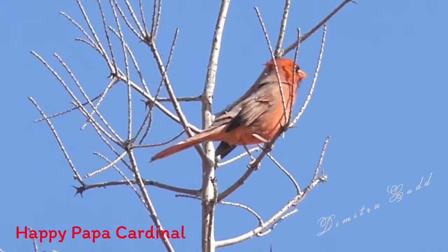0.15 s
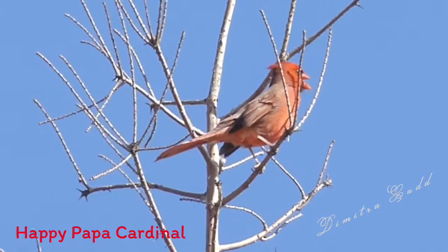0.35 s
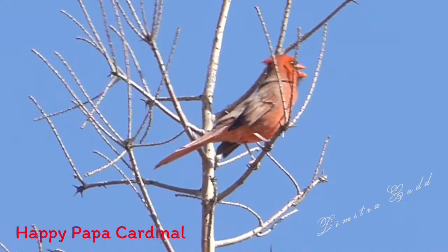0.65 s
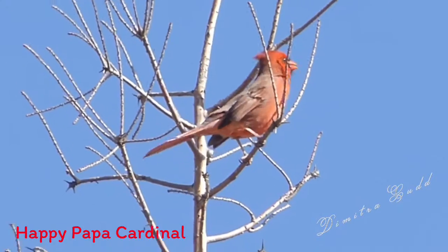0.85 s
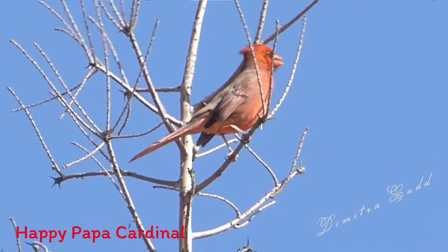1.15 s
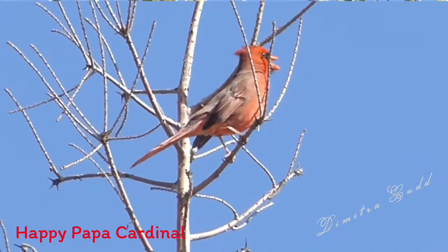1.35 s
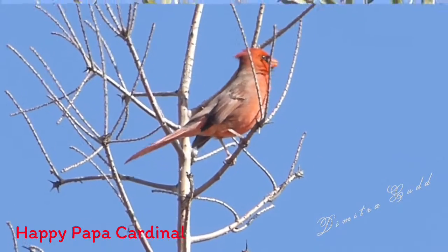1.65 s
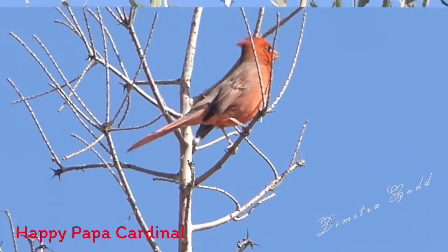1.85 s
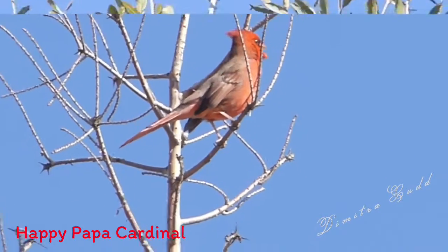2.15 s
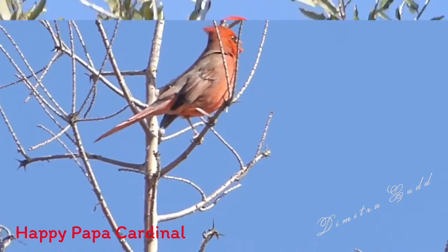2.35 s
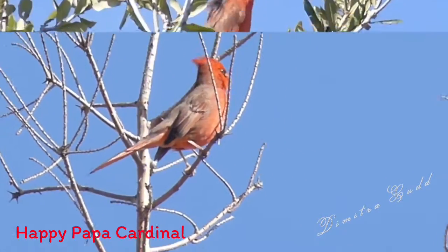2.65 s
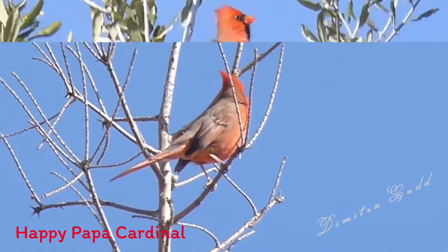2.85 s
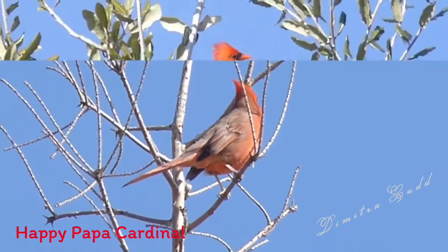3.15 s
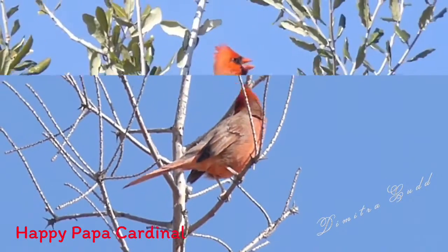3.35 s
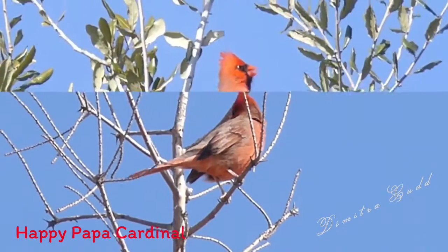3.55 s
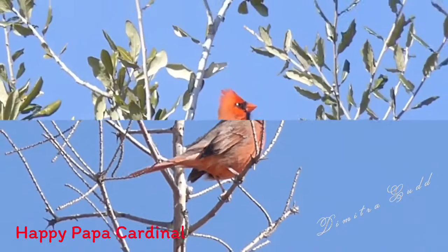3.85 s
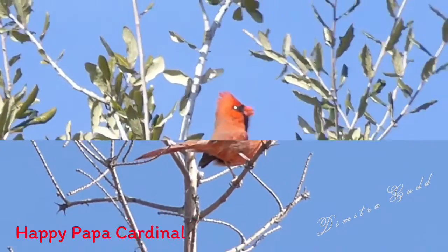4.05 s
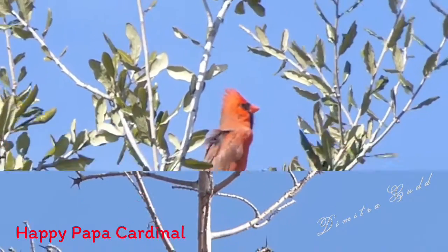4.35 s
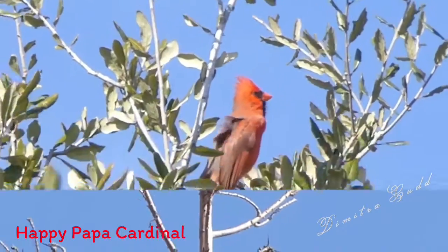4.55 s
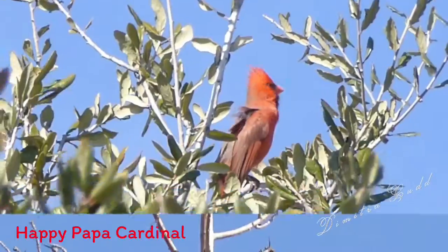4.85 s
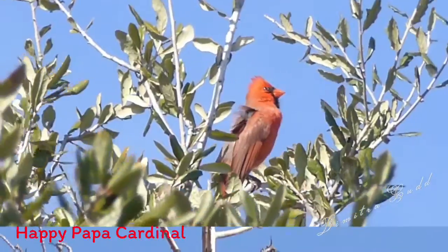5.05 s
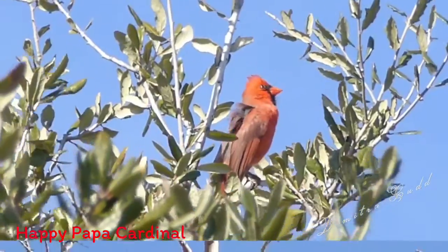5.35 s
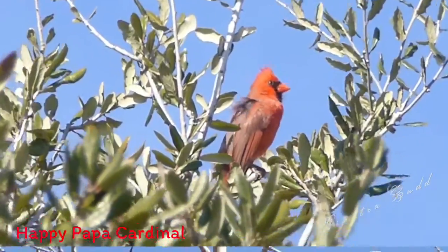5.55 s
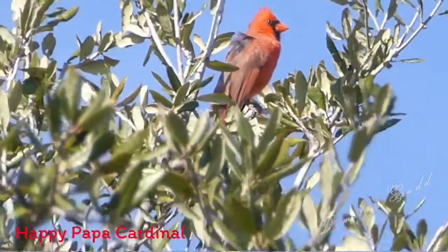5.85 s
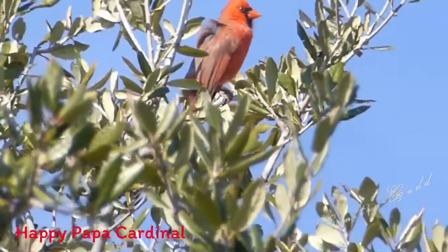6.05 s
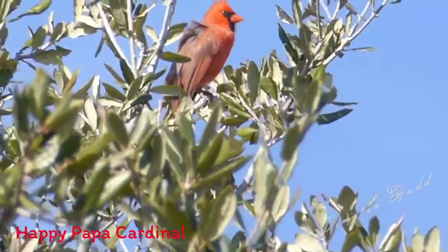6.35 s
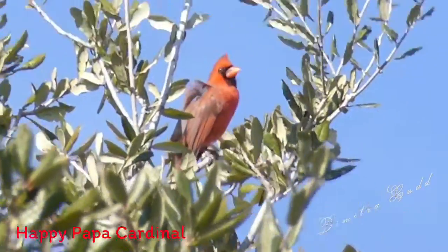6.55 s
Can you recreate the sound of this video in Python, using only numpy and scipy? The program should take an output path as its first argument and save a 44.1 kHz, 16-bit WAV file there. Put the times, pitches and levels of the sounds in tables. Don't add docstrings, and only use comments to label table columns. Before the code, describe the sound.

A near cardinal is already sliding down a pure whistle at the start, with a faint farther bird's low phrase around 0.2 s. A very steep high fall comes at 0.4 s, then a full down-slur from 0.55 to 0.75 s. After a shy upward sweep at 0.85 s, an even trill of sixteen quick rising chirps runs from 0.95 to 2.7 s, about nine per second, softening slightly. From 1.5 s the farther bird overlaps, alternating thin high falls with low notes that flip up; its falls sink and lengthen, becoming clearer from 3.4 s and slower until 5 s. Garden echoes blur both songs. Wind rumbles and pops on the right from 1.2 s, strongest near 1.4 and 2.4 s, with weaker puffs until 5.4 s. Town murmur, leaf hiss and a faint early engine hum recede, leaving quiet air until 6.7 s.

```python
import sys
import numpy as np
from scipy import signal
from scipy.fft import rfft, irfft
from scipy.io import wavfile
from scipy.ndimage import uniform_filter1d

SR = 44100
rng = np.random.default_rng(int(sys.argv[2]) if len(sys.argv) > 2 else 0)


def store_pcm(level_fs):
    pcm = np.round(np.clip(level_fs, -1, 1) * 32767).astype(np.int16)
    wavfile.write(sys.argv[1], SR, np.atleast_2d(pcm).T)


def decibels_to_gain(level_db):
    exponent = np.asarray(level_db, float) / 20
    return 10 ** exponent


N = 295470
TIME = np.arange(N) / SR
LEAD = SR // 4

# (time [s], pitch [Hz], level [dB])
STEEP_WHISTLE = [(.42, 8800, -52), (.455, 7220, -40), (.495, 5600, -36.5), (.512, 4960, -34),
                 (.527, 5010, -49)]
# (time after start [s], pitch [Hz], level under top [dB])
SLUR_SHAPE = [(0, 4080, -18), (.01, 3960, -6), (.05, 3664, -5), (.1, 3375, 0), (.15, 2977, -2),
              (.18, 2860, -3.5), (.21, 2830, -15)]
# (start [s], top level [dB])
SLUR_STARTS = [
    (-.14, -34),
    (.556, -29),
]
# (time [s], pitch [Hz], level [dB])
SHY_SWEEP = [(.848, 2000, -58), (.86, 2670, -36.5), (.875, 3520, -34.5), (.887, 4170, -36),
             (.897, 4730, -48)]
# (time after start [s], pitch [Hz], level under top [dB])
SWEEP_SHAPE = [(.007, 1955, -10), (.012, 2266, -11), (.018, 2577, -1.5), (.031, 3192, 1.5), (.046, 4013, 5),
               (.0535, 4550, 2), (.0565, 4860, -3.5), (.059, 6040, -17.5)]
# (start [s], top level [dB])
TRILL = [(0.95, -34.5), (1.063, -33), (1.178, -31.5), (1.295, -32.5), (1.406, -33), (1.519, -32.5),
         (1.634, -33), (1.748, -33), (1.86, -33.5), (1.972, -34), (2.084, -35), (2.198, -35.5),
         (2.308, -37.5), (2.426, -35.5), (2.539, -36.5), (2.654, -37)]
# (multiple [x], level [dB])
SLUR_OVERTONES = [(3, -23.5)]
# (lag [s], level [dB])
WALL_SLAPS = [
    (.034, -17.5),
    (.055, -22.5),
]

# (start [s], shelf pitch [Hz], hook [s], plunge [s], level [dB])
SINKING_FALLS = [
    (1.542, 6350, .036, 0.0049, -58),
    (1.742, 6290, 0.027, 0.001, -51),
    (1.937, 6300, 0.03, 0.00086, -53.5),
    (2.134, 6150, 0.024, 0.0011, -49.5),
    (2.327, 5940, 0.026, 0, -45.5),
    (2.521, 5560, 0.028, 0.00055, -50.5),
    (2.712, 4800, 0.035, 0.005, -53),
    (2.896, 4460, .027, 0.014, -56.5),
    (3.087, 4400, 0.021, 0.017, -53.5),
    (3.276, 4405, 0.021, 0.021, -53),
]
# (time after start [s], pitch [Hz], level under top [dB])
FALL_SHAPE = [(.002, 7255, -16), (.005, 5280, -19.5), (.009, 4480, -3.5), (.014, 4010, 0.5),
              (.021, 3835, -0.5), (.028, 3360, 2), (.035, 2800, -0.5), (.041, 2420, -5.5),
              (.05, 2000, -21.5)]
# (start [s], top level [dB])
FALL_STARTS = [(3.468, -43.5), (3.682, -43.5), (3.89, -42.5), (4.122, -44.5), (4.355, -43.5), (4.59, -43),
               (4.822, -44.5)]
# (flip [s], from [Hz], climb level [dB], flip pitch [Hz], flip level [dB])
FLIP_NOTES = [
    (1.856, 1780, -57, 2770, -52),
    (2.054, 1780, -55, 2790, -47.5),
    (2.253, 1775, -53.5, 2780, -46),
    (2.446, 1760, -50.5, 2736, -42.5),
    (2.636, 1730, -54, 2500, -46),
    (2.826, 1634, -57.5, 2158, -48.5),
    (3.011, 1637, -56, 2274, -49),
    (3.203, 1576, -56.5, 2078, -48.5),
    (3.406, 1580, -54.5, 2016, -55.5),
]
# (time after start [s], pitch [Hz], level under top [dB])
LOW_SHAPE = [(-.025, 1327, -25), (-.005, 1505, -20), (.012, 1611, -1.5), (.026, 1740, -11),
             (.04, 1840, 5.5), (.054, 1855, -7), (.064, 2000, -19)]
# (start [s], top level [dB])
LOW_STARTS = [(3.573, -50), (3.792, -51), (4.013, -54), (4.247, -52)]
# (time after start [s], pitch [Hz], level under top [dB])
LATE_LOW_SHAPE = [(-.04, 1270, -20), (-.02, 1400, -11), (0, 1500, -14), (.016, 1620, -2), (.027, 1720, -6),
                  (.04, 1840, 3.5), (.054, 1940, -8)]
# (start [s], top level [dB])
LATE_LOW_STARTS = [(4.481, -52), (4.714, -52), (4.955, -56)]
# (time [s], pitch [Hz], level [dB])
FIRST_PHRASE = [(.15, 1715, -55), (.165, 1640, -62), (.182, 1648, -66), (.197, 1950, -51), (.212, 2005, -82),
                (.235, 1954, -48), (.26, 1900, -45), (.285, 1770, -57)]
# (multiple [x], level [dB])
FALL_OVERTONES = [(2.3, -28.5)]
# (multiple [x], level [dB])
LOW_OVERTONES = [(4, -19)]

# (start [s], hold [s], buffeting level [dB])
GUST_EVENTS = [(1.205, .22, -33.5), (1.54, 0.093, -38.5), (1.802, 0.26, -33.5), (2.402, .11, -27),
               (2.736, .08, -33.5), (3.0, 0.25, -43), (3.393, 0.2, -33.5), (3.774, 0.086, -44.5),
               (4.083, 0.033, -37.5), (4.28, 0.079, -41.5), (4.43, 0.13, -37), (4.683, 0.14, -39),
               (5.335, 0.083, -46.5)]
# (time [s], peak level [dB], pitch [Hz])
PRESSURE_POPS = [(1.161, -23.5, 196), (1.377, -12, 332), (1.396, -21, 384), (1.855, -25.5, 182),
                 (2.107, -19.5, 154), (2.39, -19, 305), (2.417, -36, 175), (2.449, -29, 160),
                 (2.482, -28, 214), (2.76, -22, 192), (3.317, -25.5, 192), (3.595, -30.5, 152.7),
                 (3.799, -41, 122), (4.091, -23.5, 327), (4.146, -27.5, 232), (4.348, -26, 210),
                 (4.533, -25, 252), (4.575, -28, 269), (4.739, -21.5, 225), (5.329, -32.5, 260)]
# (time [s], peak level [dB], pitch [Hz])
SHARP_FLAPS = [
    (1.398, -40, 590),
    (2.419, -33, 1030),
    (2.455, -25, 584),
    (2.484, -34, 825),
    (3.444, -39, 630),
    (4.15, -31, 490),
    (4.6, -37.5, 794),
    (4.745, -29.5, 480),
]
# (frequency [Hz], density [dB per Hz])
RUMBLE_SPECTRUM = [(30, -16), (60, -35), (80, -12), (110, -3), (150, -1.5), (200, -0.5), (280, -4.5),
                   (400, -15.5), (560, -25.5), (900, -59), (1500, -65), (4000, -120)]

# (time [s], town murmur level [dB], leaf hiss level [dB])
AIR_LEVELS = [(0, -46.5, -56), (.6, -45.5, -59.5), (1.3, -44.5, -55.5), (2, -45.5, -57.5),
              (3, -48.5, -61.5), (4, -50, -64.5), (5, -49.5, -66), (5.8, -49, -65.5), (6.7, -49, -67)]
# (frequency [Hz], density [dB per Hz])
TOWN_SPECTRUM = [(15, -69), (25, -24), (171, 6), (204, 1), (331, -0.5), (372, -3.5), (435, -6), (498, -6),
                 (795, -6.5), (1200, -14), (1700, -19), (2600, -29.5), (3380, -59), (5720, -120)]
# (frequency [Hz], density [dB per Hz])
LEAF_SPECTRUM = [(1200, -19), (2000, -4.5), (3400, 0.5), (5500, -6), (8000, -6.5), (10500, -9.5),
                 (13000, -26), (15500, -29)]
# (frequency [Hz], width [Hz], level [dB])
ENGINE_BANDS = [(257, 22, -50.5), (377.6, 24, -52.5)]
# (time [s], level [dB])
ENGINE_FADE = [(0, -3), (.5, 0), (1.1, 5), (1.6, -9.5), (3, -52)]
# (frequency [Hz], density [dB per Hz])
MIC_SPECTRUM = [(1500, -3), (5000, -27), (10000, 2), (13000, 8.5), (15200, 1.5)]

BEAK_HZ, WIDE_BEAK_HZ = 7930, 12700


def near_bird():
    ground_lag_s = .005
    steep = whistle([STEEP_WHISTLE], [(2, -24)], WIDE_BEAK_HZ)
    slurs = whistle(repeat(SLUR_SHAPE, SLUR_STARTS, 0.0011), SLUR_OVERTONES)
    trill = whistle([SHY_SWEEP] + repeat(SWEEP_SHAPE, TRILL, 0.0061), [(2, -28.0)])
    song = steep + slurs + trill
    ports = []
    for lag in (1 / SR, 0):
        direct = delay(song, lag - ground_lag_s / 2)
        bounce = decibels_to_gain(-5.5) * delay(song, lag + ground_lag_s / 2)
        walls = sum(decibels_to_gain(db) * delay(song, lag + s) for s, db in WALL_SLAPS)
        ports.append(direct + bounce + walls)
    scattered = garden(song, 0.85, 0.99, -6.5, 0.0044)
    return decibels_to_gain(np.array([[-5.5], [-2.2]])) * np.array(ports) + decibels_to_gain(-11.0) * scattered


def far_bird():
    hooks = whistle([fall(*row) for row in SINKING_FALLS[:7]], [(1.94, -16)], WIDE_BEAK_HZ)
    plunges = [fall(*row) for row in SINKING_FALLS[7:]]
    falls = whistle(plunges + repeat(FALL_SHAPE, FALL_STARTS, .006), FALL_OVERTONES)
    low_notes = [flip(*row) for row in FLIP_NOTES]
    low_notes += repeat(LOW_SHAPE, LOW_STARTS, 0.0058)
    low_notes += repeat(LATE_LOW_SHAPE, LATE_LOW_STARTS, .005)
    lows = whistle(low_notes, LOW_OVERTONES)
    away = whistle([FIRST_PHRASE], [(3.7, -19.5)])

    song = hooks + falls + lows + away
    bounces = decibels_to_gain(-5.5) * delay(song, .004) + decibels_to_gain(-15.5) * delay(song, 0.045)
    heard = decibels_to_gain(1.5) * (delay(song, 0) + bounces)
    to_garden = decibels_to_gain(-5) * hooks + falls + decibels_to_gain(-3.5) * lows + decibels_to_gain(3.5) * away
    scattered = garden(to_garden, 0.32, 1.5, -12.0, 0.012)
    return heard * decibels_to_gain(np.array([[.3], [-.3]])) + decibels_to_gain(-2.0) * scattered


def fall(start, shelf_hz, hook, plunge, db):
    hook_top_hz, hook_s, hook_share, plunge_to_hz = 7700, .004, .72, 2310
    attack_s, attack_db, release_s, release_db = 0.012, -4.5, .008, -6.5
    s = np.arange(0, hook + plunge, 1 / 1000)
    left = hook_share * np.exp(-s / hook_s) + (1 - hook_share) * np.clip(1 - s / hook, 0, 1)
    hz = shelf_hz + (hook_top_hz - shelf_hz) * left
    if plunge > 1 / 200:
        hz = hz - (shelf_hz - plunge_to_hz) * np.clip((s - hook) / plunge, 0, 1)
        db = db + 6.5 * np.clip(s / hook, 0, 1)
    else:
        db = db - 7.5 * s / hook
    attack = attack_db * np.clip(1 - s / attack_s, 0, 1)
    release = release_db * np.clip(1 - (s[-1] - s) / release_s, 0, 1)
    return np.transpose([start + s, hz, db + attack + release])


def flip(at, from_hz, climb_db, top_hz, db):
    climb_s, break_s, flip_s, shoulder_hz = .052, 0.0105, 0.0207, 1900
    sag_hz = 0.35 * (top_hz - shoulder_hz)
    return [(at - climb_s, from_hz, climb_db - 18.5),
            (at - climb_s / 2, (from_hz + shoulder_hz) / 2, climb_db),
            (at - break_s, shoulder_hz, climb_db + 1.5),
            (at - break_s / 2, (shoulder_hz + top_hz) / 2, climb_db + 0.5),
            (at, top_hz, db),
            (at + flip_s / 2, top_hz - sag_hz / 2, db - 3.0),
            (at + flip_s, top_hz - sag_hz, db - 9.5)]


def repeat(shape, events, vary):
    return [[(start + s, hz * (1 + vary * rng.standard_normal()), top + db) for s, hz, db in shape]
            for start, top in events]


def whistle(notes, tones, beak_hz=BEAK_HZ, edge_s=.002):
    beak_octaves = 0.41
    out = np.zeros(N + 2 * LEAD)
    for note in notes:
        s, hz, db = np.transpose(note)
        i = np.arange(int((s[0] - edge_s) * SR), int((s[-1] + edge_s) * SR))
        f = uniform_filter1d(np.interp(i / SR, s, hz), int(edge_s * SR), mode="nearest")
        gate = np.clip(np.minimum(i - i[0], i[-1] - i) / (edge_s * SR), 0, 1)
        phase = 2 * np.pi * np.cumsum(f) / SR
        tone = np.sin(phase)
        for multiple, tone_db in tones:
            off_beak = np.log2(multiple * f / beak_hz) / beak_octaves
            tone = tone + decibels_to_gain(tone_db - 9.4 * off_beak ** 2) * np.sin(multiple * phase)
        out[i + LEAD] += np.sqrt(2) * decibels_to_gain(np.interp(i / SR, s, db)) * gate * tone
    return out


def delay(song, s):
    return song[..., LEAD - round(s * SR):][..., :N]


def garden(song, early_t60, late_t60, late_db, rise_s):
    early_spectrum = [(1200, 5.5), (2200, -1.5), (4000, -2.0), (6500, 3.5), (10000, -2.5)]
    late_spectrum = [(1200, -5), (2200, 1.0), (3500, -2.5), (6000, 5.5), (10000, -0.5)]
    t, out = TIME[:SR], 0
    blend = np.array([walk(3) for _ in range(3)])
    for share in blend / np.sqrt(np.sum(blend ** 2, axis=0)):
        early, late = rng.standard_normal((2, 2, SR))
        early = colour(early * decibels_to_gain(3.5 * walk(106.2)[:SR] - 60 * t / early_t60), early_spectrum)
        late = colour(late * decibels_to_gain(late_db - 60 * t / late_t60), late_spectrum)
        tail = (early + late) * (1 - np.exp(-(t / rise_s) ** 2))
        tail = unit(tail + 0.36 * tail[::-1]) / np.sqrt(SR)
        out = out + delay(signal.fftconvolve(song[None], tail, axes=1), 0) * share
    return out


def wind():
    flap_spectrum = [(100, -60), (250, -32), (400, 4.5), (700, -16.5), (1300, -12.5), (2500, -61), (5000, -120)]
    deep_spectrum = [(30, -24), (60, -15), (95, -5), (150, -6), (400, -88)]
    gust = gusts()
    noise = rng.standard_normal((2, N))
    eddies = noise * decibels_to_gain(np.array([2.9 * walk(35), 3.4 * walk(30)]))
    rumble = unit(colour(eddies, RUMBLE_SPECTRUM))
    flap = unit(colour(eddies * decibels_to_gain(2.5 * walk(60)), flap_spectrum))
    deep = unit(colour(noise, deep_spectrum))
    blown = decibels_to_gain(gust + 2.0) * (rumble + decibels_to_gain(-20 + .5 * (gust + 19.5)) * flap)
    right = blown[0] + puffs(PRESSURE_POPS, 2.93) + puffs(SHARP_FLAPS, 3.7)
    spanning = decibels_to_gain(gust - 20.5) * (deep[1] + 0.72 * deep[0])
    left = decibels_to_gain(-14) * right + decibels_to_gain(-10.5) * blown[1] + spanning
    return np.array([left, right])


def gusts():
    rise_db_s, fall_db_s = 120, 60
    start, hold, db = np.transpose(GUST_EVENTS)[..., None]
    before = np.maximum(start - TIME, 0)
    after = np.maximum(TIME - start - hold, 0)
    each = db - rise_db_s * before - fall_db_s * after
    return 10 * np.log10(np.sum(decibels_to_gain(each) ** 2, axis=0))


def puffs(events, cycles):
    out = np.zeros(N)
    for s, db, hz in events:
        turn = np.arange(int(cycles * SR / hz)) * hz / SR
        swell = np.sin(np.pi * turn / cycles) ** 2
        out[int(s * SR):][:len(turn)] += decibels_to_gain(db + 2) * np.sin(2 * np.pi * turn) * swell
    return out


def background():
    mid, side, left, right, hum = rng.standard_normal((5, N))
    side = colour(side, [(60, -27), (200, -23), (380, -10.5), (700, -4.5), (1300, 1.5), (2400, 2.5)])
    town = colour(np.array([mid + side, mid - side]), TOWN_SPECTRUM)
    town = town / np.std(town.mean(axis=0)) * decibels_to_gain(curve(AIR_LEVELS) + 1.32 * walk(3.0))
    hiss = unit(colour(np.array([left + 0.06 * right, right + 0.076 * left]), LEAF_SPECTRUM))
    hiss = hiss * decibels_to_gain(curve(AIR_LEVELS, column=2) + .5 * walk(10.0))
    engine = 0
    for hz, width, db in ENGINE_BANDS:
        band = unit(signal.lfilter(*signal.iirpeak(hz, hz / width, SR), hum))
        engine = engine + decibels_to_gain(db + 2.3 * walk(7.9)) * band
    return town * decibels_to_gain(np.array([[.8], [-.8]])) + hiss + engine * decibels_to_gain(curve(ENGINE_FADE))


def unit(x):
    return x / np.sqrt(np.mean(x ** 2, axis=-1, keepdims=True))


def colour(x, spectrum):
    hz, db = np.transpose(spectrum)
    f = np.maximum(np.arange(x.shape[-1] // 2 + 1) * SR / x.shape[-1], 1)
    return irfft(rfft(x) * decibels_to_gain(np.interp(np.log(f), np.log(hz), db)), x.shape[-1])


def walk(rate):
    k = int(SR / rate)
    steps = np.repeat(rng.standard_normal(N // k + 1), k)
    return unit(uniform_filter1d(uniform_filter1d(steps, k), k)[:N])


def curve(rows, column=1):
    return np.interp(TIME, np.array(rows)[:, 0], np.array(rows)[:, column])


def scene():
    return near_bird() + far_bird() + wind() + background()


def band_limit(x):
    return signal.sosfilt(signal.butter(12, 15300, fs=SR, output="sos"), x)


def record(dry):
    shared, left, right = rng.standard_normal((3, N))
    hiss = unit(colour(np.array([shared + 1.5 * left, shared + 1.6 * right]), MIC_SPECTRUM))
    bass_cut = signal.butter(4, 58, "high", fs=SR, output="sos")
    top_cut = signal.ellip(8, .2, 50, 15300, fs=SR, output="sos")
    mix = signal.sosfilt(bass_cut, dry + decibels_to_gain(-73.0) * hiss)
    mix = signal.sosfilt(top_cut, mix)
    return band_limit(mix)


dry = scene()
out = record(dry)
store_pcm(out)
```